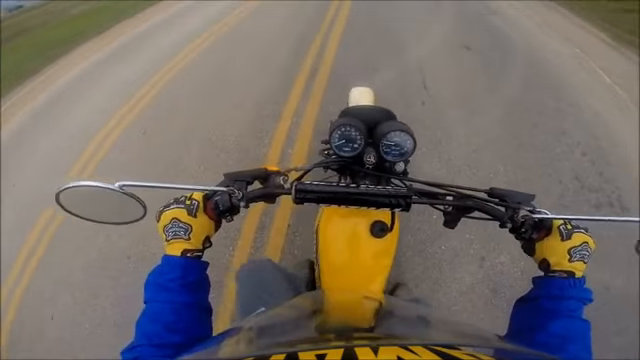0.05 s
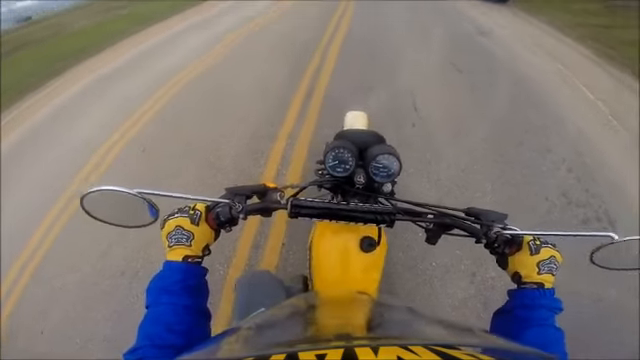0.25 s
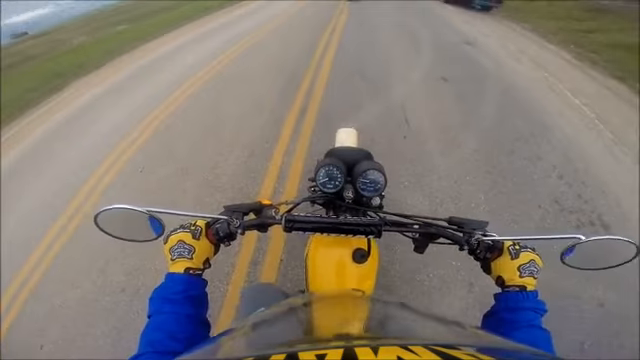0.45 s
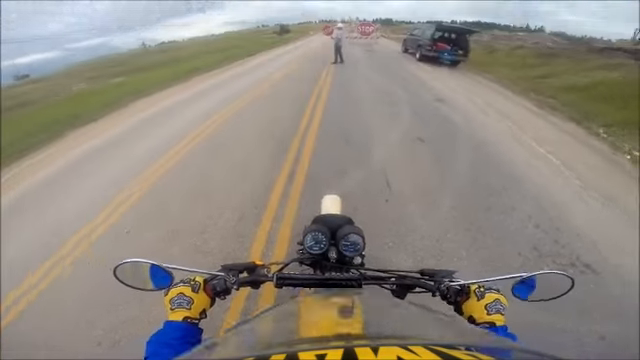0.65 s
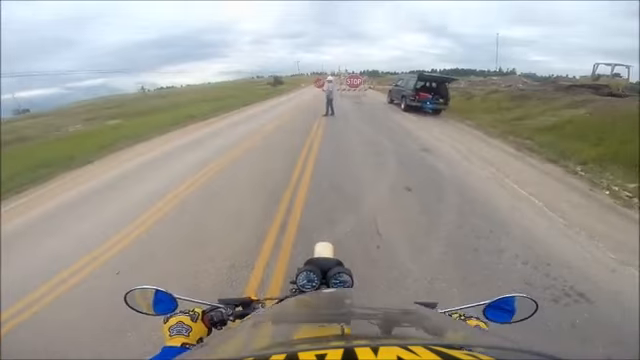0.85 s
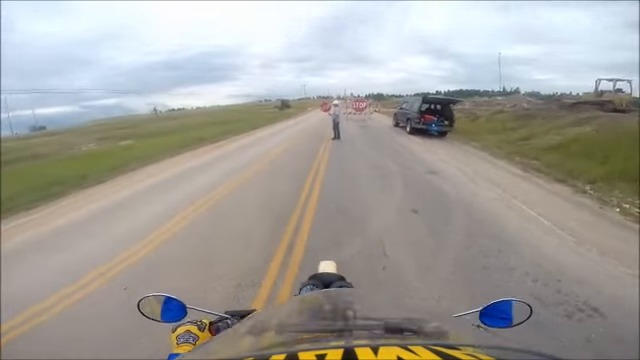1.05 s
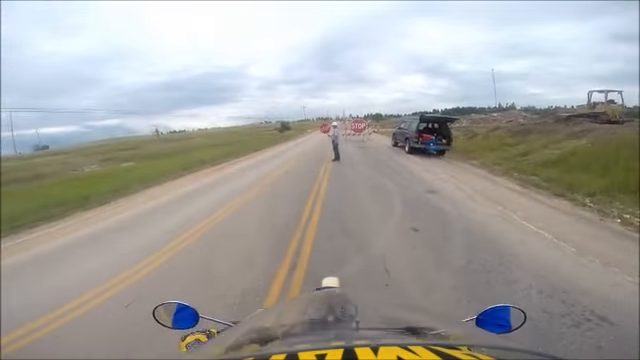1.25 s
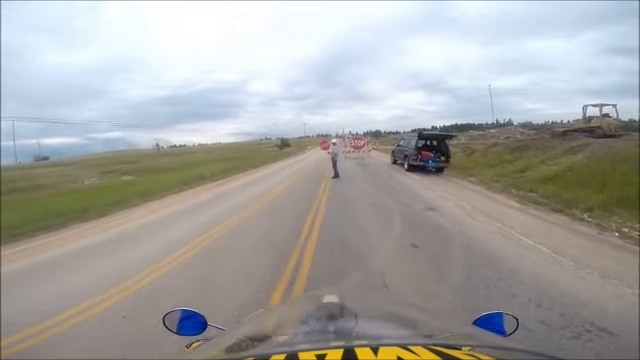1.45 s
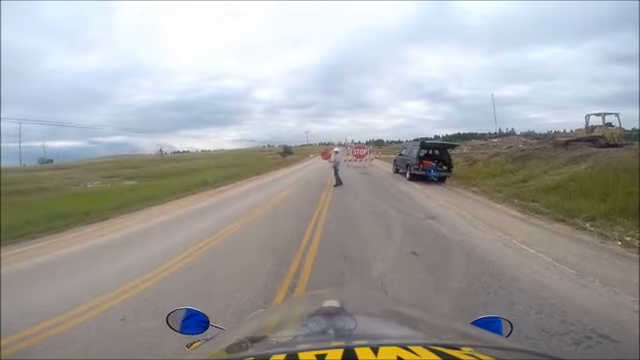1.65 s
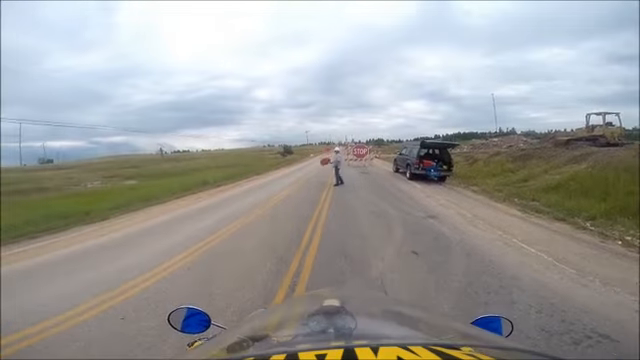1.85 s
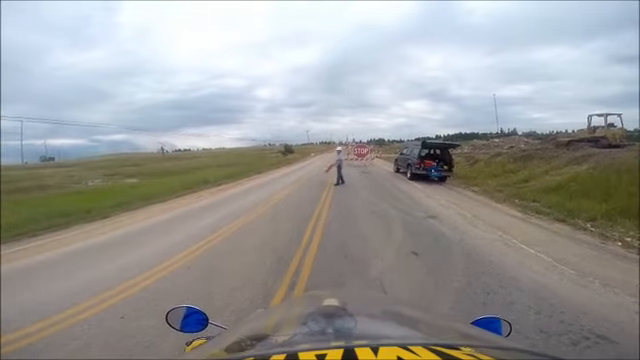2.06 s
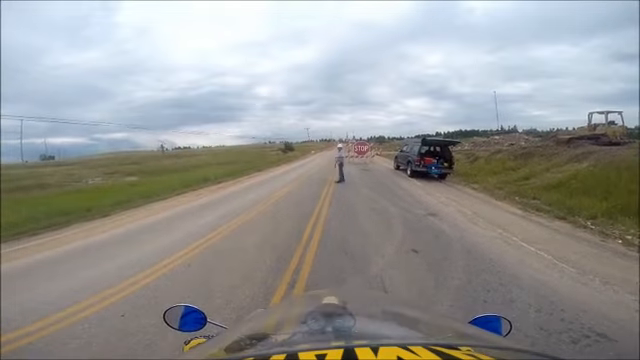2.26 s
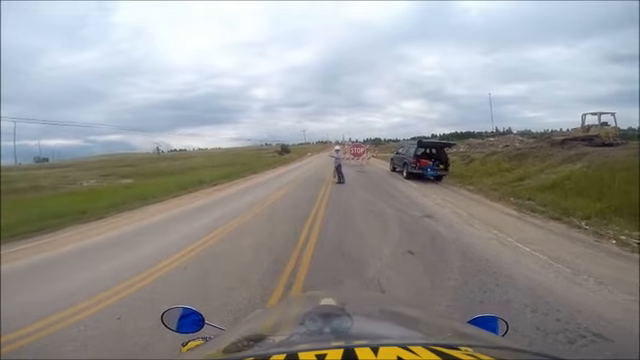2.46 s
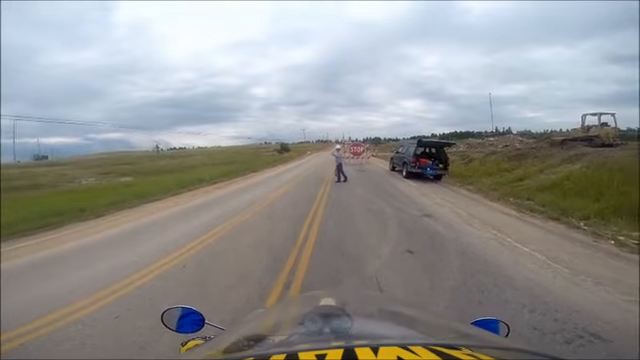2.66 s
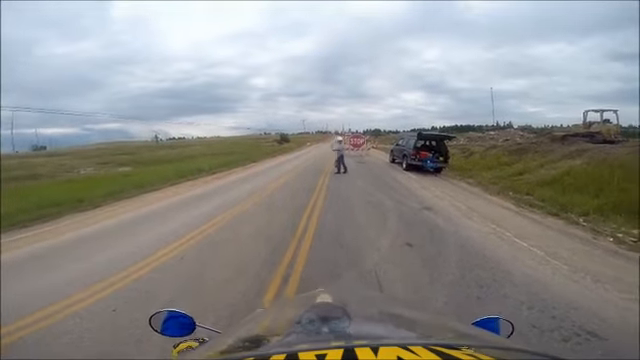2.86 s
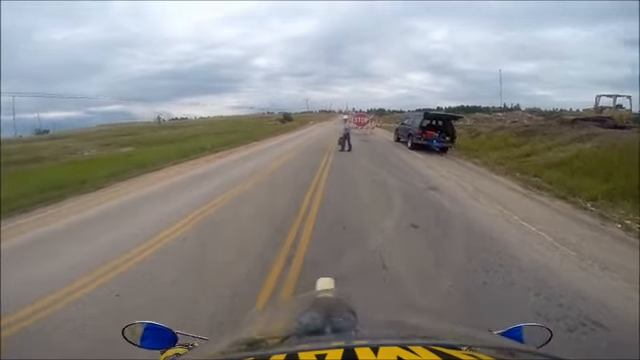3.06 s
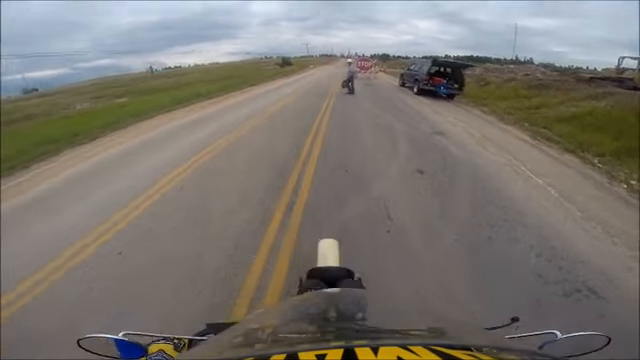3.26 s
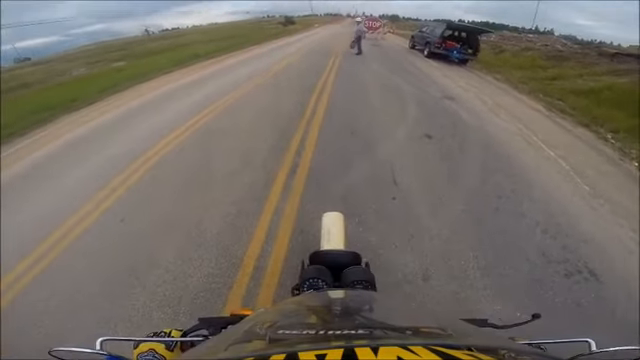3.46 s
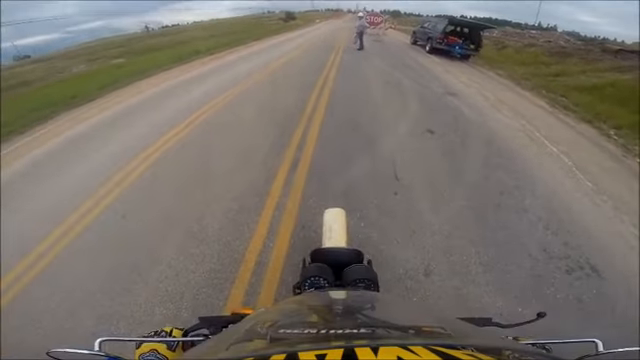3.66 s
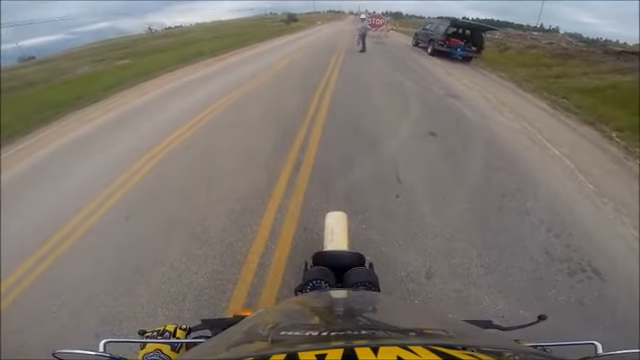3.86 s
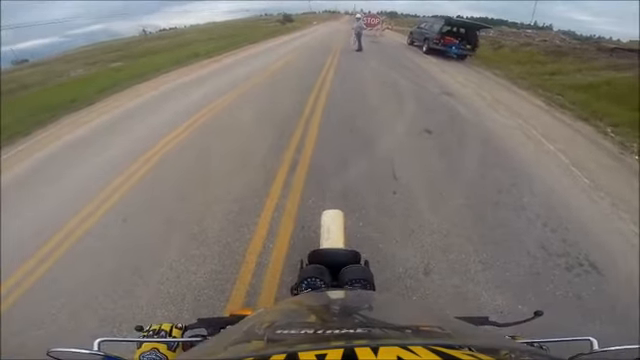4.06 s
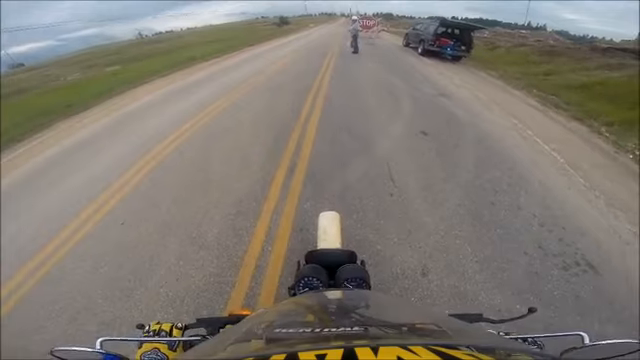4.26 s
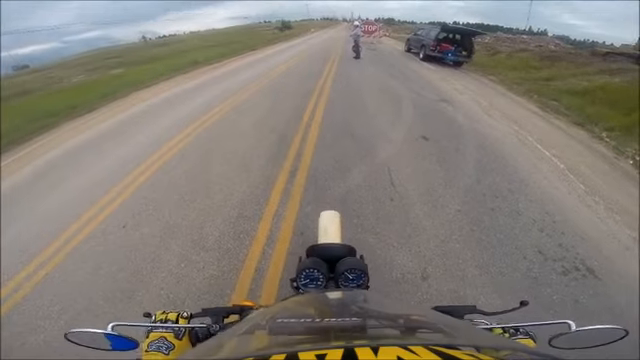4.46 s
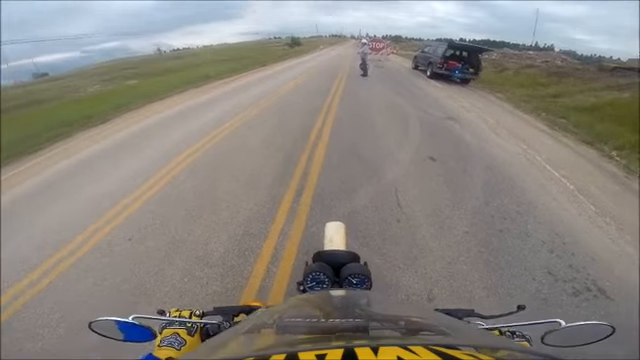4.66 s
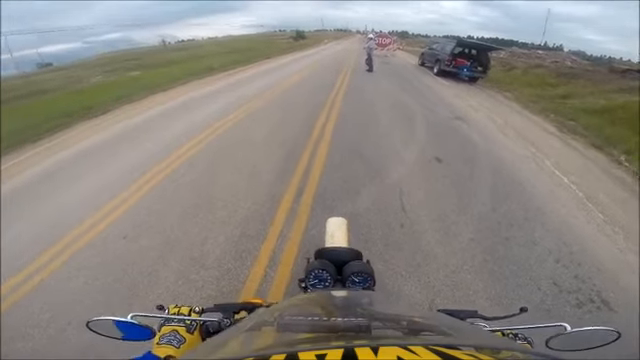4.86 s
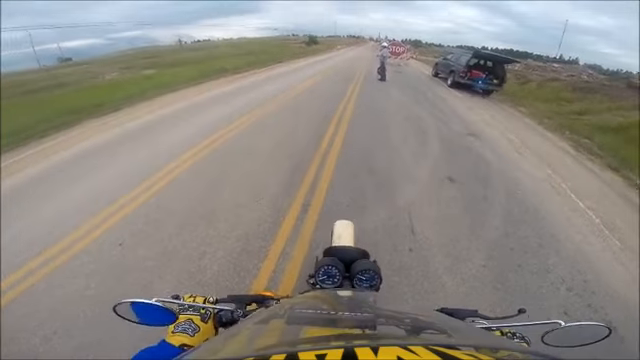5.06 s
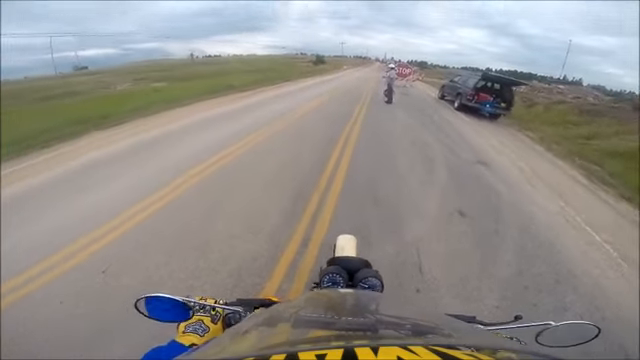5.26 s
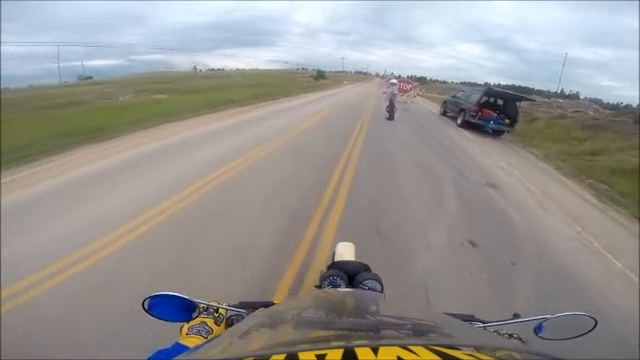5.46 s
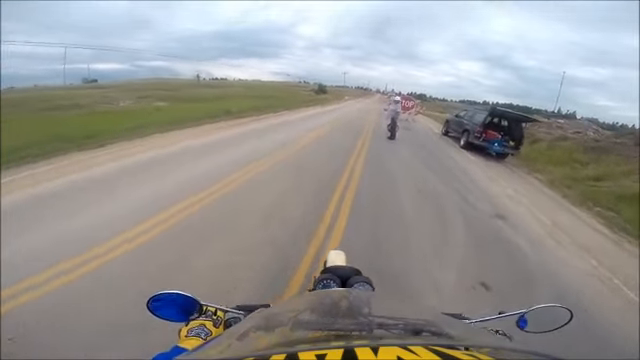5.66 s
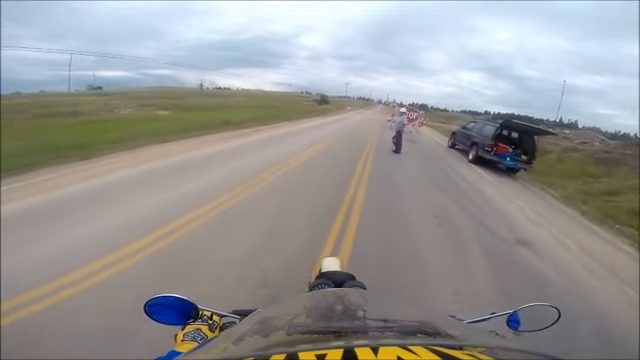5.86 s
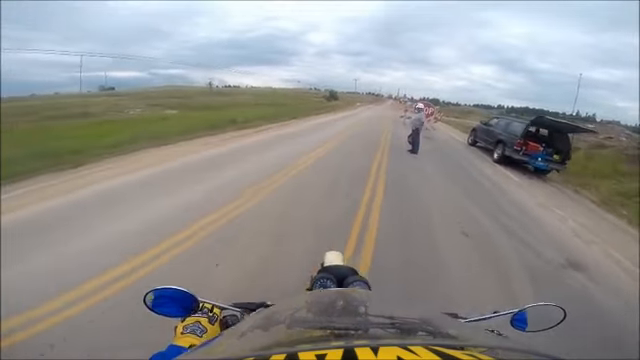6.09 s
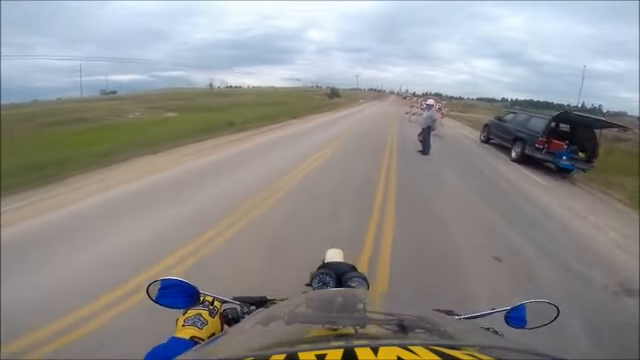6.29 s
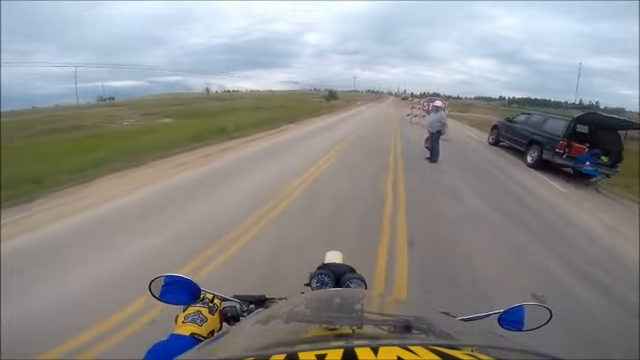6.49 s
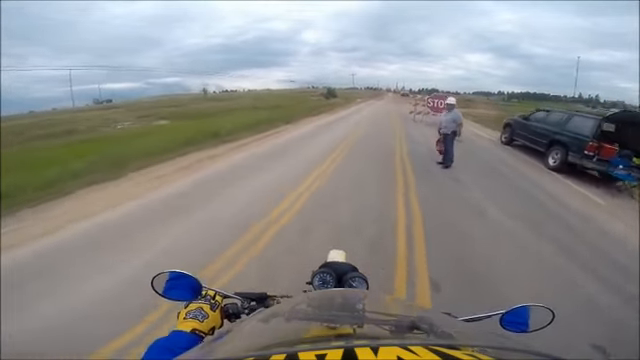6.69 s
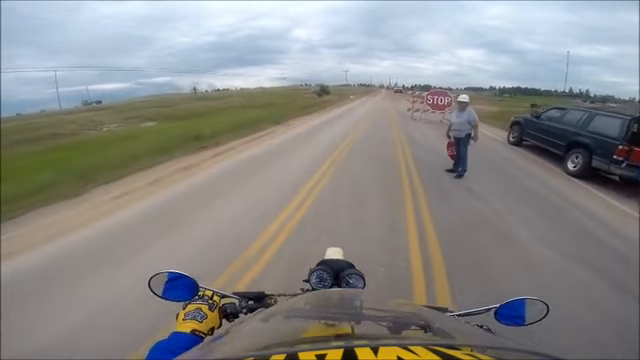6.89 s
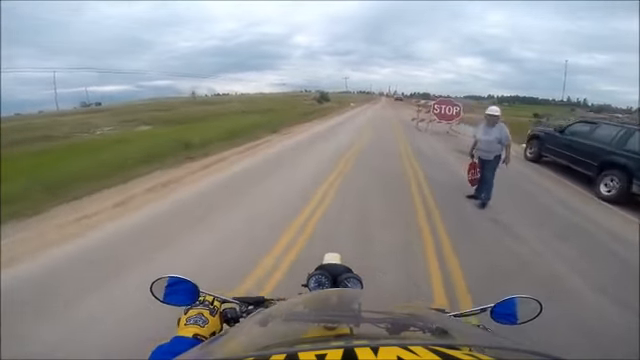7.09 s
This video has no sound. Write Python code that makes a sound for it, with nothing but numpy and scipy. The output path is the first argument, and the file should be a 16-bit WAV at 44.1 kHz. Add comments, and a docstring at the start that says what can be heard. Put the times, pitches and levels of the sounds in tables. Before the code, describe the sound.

A two-stroke motorcycle idles with uneven metallic pops, revs once, then pulls away with a steady rising buzz over light wind.

```python
"""Two-stroke motorcycle pulling away

A single cylinder, heard from the rider's helmet. It coasts at idle, firing only every few turns
(ring, ding, ding), takes a blip of throttle in bursts of firings, then pulls away evenly.
Every crank turn puffs the exhaust; firings ring the thin pipe shell and the cooling fins.
Light wind rumbles underneath, with a faint whine, two small rattles and one low sliding tone."""
import sys
import numpy as np
from scipy import signal
from scipy.fft import rfft, irfft, next_fast_len
from scipy.io import wavfile
from scipy.ndimage import uniform_filter1d

SR = 44100
rng = np.random.default_rng(int(sys.argv[2]) if len(sys.argv) > 2 else 0)


def wav_record(signal):
    """Record a signal, one row per channel, as 16-bit PCM in the file named by sys.argv[1]."""
    frames = np.transpose(np.atleast_2d(signal))
    bounded = np.clip(frames, -1, 1)
    # unit amplitude maps onto the largest positive 16-bit level
    quanta = np.round(bounded * 32767).astype(np.int16)
    wavfile.write(sys.argv[1], SR, quanta)


N = 314433
T = np.arange(N) / SR
SIZE = next_fast_len(N + SR)
FREQ = np.maximum(np.arange(SIZE // 2 + 1) * SR / SIZE, 1)
# bands in which the layers' levels are set: low_hz, high_hz
PUFF_BAND, RING_BAND, HISS_BAND = (200, 480), (900, 3300), (3300, 9000)
BANG_BAND, CRACK_BAND, NOTE_BAND = (900, 2200), (2200, 9000), (400, 4000)
BUFFET_BAND, RUSH_BAND = (12, 32), (65, 170)
CRUISE_HZ, FULL_FIRING_DB = 35, -40
HIT_SIZE = np.sqrt(.02 * SR)  # an impulse with the energy of 20 ms at unit rms


def undb(db):
    """Decibels to gain."""
    return 10 ** (np.asarray(db) / 20)


def curve(table, t):
    """Value at the times t of an envelope of (time_s, value) points."""
    return np.interp(t, *np.transpose(table))


def colour(points):
    """Gain at every frequency from (freq_hz, level_db) points."""
    hz, db = np.transpose(points)
    return undb(np.interp(np.log(FREQ), np.log(hz), db))


def peak(hz, width_hz):
    """Gain of one resonance, 1 at its centre."""
    return 1 / np.sqrt(1 + ((FREQ ** 2 - hz ** 2) / (FREQ * width_hz)) ** 2)


def above(hz):
    """Gain of a steep high-pass."""
    return 1 / np.sqrt(1 + (hz / FREQ) ** 12)


def unit(gain, band):
    """Scale a response so that unit white noise comes out with unit rms inside the band."""
    return gain / np.sqrt(np.mean(gain ** 2 * ((FREQ > band[0]) & (FREQ < band[1]))))


def resonate(x, gain):
    """Causal filter with this gain: narrow peaks ring on after a blow."""
    cepstrum = irfft(np.log(gain + 1e-9), SIZE)
    cepstrum[1:SIZE // 2] *= 2
    cepstrum[SIZE // 2 + 1:] = 0
    return irfft(rfft(x, SIZE) * np.exp(rfft(cepstrum)), SIZE)[:N]


def pulses(times, sizes):
    """One impulse at each time."""
    inside = (times >= 0) & (times < T[-1])
    return np.bincount((times[inside] * SR).astype(int), sizes[inside], N)


def gas(times, sizes, rise_s, decay_s):
    """A burst of turbulent noise after each time, with the energy of an impulse of that size."""
    t = T[:SR // 4]
    power = ((1 - np.exp(-(t / rise_s) ** 2)) * np.exp(-t / decay_s)) ** 2
    envelope = signal.fftconvolve(pulses(times, sizes ** 2), power / power.sum())[:N]
    return np.sqrt(np.maximum(envelope, 0)) * rng.standard_normal(N)


def disperse(x, spread_s, step_hz):
    """Smear each blow alike: every frequency has its own delay, as in bending waves in sheet metal."""
    delay = spread_s * np.interp(FREQ / step_hz, np.arange(512), rng.random(512))
    return irfft(rfft(x, SIZE) * np.exp(-2j * np.pi * np.cumsum(delay) * SR / SIZE), SIZE)[:N]


def turn_db(effort, hz, cruise_db, per_effort, per_octave):
    """Level of an ordinary turn: it follows effort and crank speed from its value in a steady cruise."""
    return cruise_db + per_effort * effort + per_octave * np.log2(hz / CRUISE_HZ)


# the revs, from idle through the blip to pulling away: time_s, turns_hz
CRANK_SPEED = [(0.0, 26.11), (1.5, 26.14), (3.5, 24.44), (3.95, 29.12), (4.2, 44.58), (4.48, 58.23),
               (4.65, 52.21), (4.92, 44.63), (5.19, 29.42), (5.48, 32.99), (5.85, 32.5), (6.17, 39.09),
               (6.6, 44.31), (7.13, 51.98)]

def crank():
    """Crank angle in turns, nudged so that the listed firings fall near whole turns."""
    angle = np.cumsum(curve(CRANK_SPEED, T)) / SR
    times = np.transpose(HARD_FIRINGS)[0]
    at_firing = np.interp(times, T, angle)
    whole_turns = np.cumsum(np.round(np.diff(at_firing, prepend=0)))
    lead = np.interp(T, times, whole_turns - at_firing)
    return angle + uniform_filter1d(lead, size=SR // 9)  # the nudges are spread smoothly over about a tenth of a second


# tone of the exhaust outlet: freq_hz, relative_db
EXHAUST_EQ = [(30, -24), (80, -23), (120, -10.5), (165, -14.5), (222, -4.5), (262, 0), (325, 5.5),
              (375, -4), (450, -15.5), (495, -6.5), (555, -32.5), (620, -14), (750, -17.5), (900, -27),
              (3000, -38), (12000, -70)]

def exhaust(times, sizes, hz):
    """Each turn sends a pressure pulse down the pipe; its reflection is strongest at middling revs."""
    reflected = np.interp(hz, [28, 31.7, 39.7, 53.4], [.072, .15, .38, .033])
    blow = pulses(times + .00175, sizes) + pulses(times + .01085, sizes * reflected)
    flutter = .07 * gas(times, sizes, rise_s=.003, decay_s=.012)
    swell = uniform_filter1d(blow, size=12)  # the port takes a moment to open
    return resonate(swell + flutter, unit(colour(EXHAUST_EQ), PUFF_BAND))


# the rider's head, 0 upright to 1 bowed over the tank: time_s, bow_fraction
HEAD_BOW = [(0, 0.97), (.55, 0.85), (.9, 0.54), (1.4, 0.08), (3.05, 0.02), (3.6, 0.69), (4.1, 0.88),
            (5.0, 0.71), (5.7, 0.87)]
# tone of the drone with the head up: freq_hz, relative_db
HEAD_UP_EQ = [(40, -38.5), (88, 8), (130, -9), (160, -30), (195, 5), (240, -10), (300, 0.5), (345, 3),
              (400, -24.5), (500, -4), (800, -28), (2000, -40), (6000, -91)]
# tone of the drone with the head bowed: freq_hz, relative_db
HEAD_DOWN_EQ = [(40, -53), (88, -11), (135, 0), (185, 4), (240, -10.5), (320, -16), (375, 5), (425, -1),
                (480, -27), (800, -25.5), (2000, -53), (6000, -86)]

def piston_drone(times, hz):
    """The piston pumps air, down and up: a soft drone whose level and colour follow the rider's head."""
    head_up_db, bowed_boost_db = -57, 8
    level_db = head_up_db + bowed_boost_db * curve(HEAD_BOW, times) + rng.standard_normal(len(times))
    sizes = undb(level_db) * np.sqrt(SR / hz)
    strokes = pulses(times + .003894, sizes) + .5 * pulses(times + .47 / hz, sizes)
    air = .7 * disperse(strokes, spread_s=.022, step_hz=90)
    air += .55 * gas(times, sizes, rise_s=.008, decay_s=.04)
    up, down = (resonate(air, unit(colour(eq), PUFF_BAND)) for eq in (HEAD_UP_EQ, HEAD_DOWN_EQ))
    bowed = curve(HEAD_BOW, T)
    return (1 - bowed) * up + bowed * down


# ringing modes of the pipe shell and fins: pitch_hz, width_hz, hard_firing_db, even_running_db
METAL_MODES = [(975.4, 14.7, -5, -9), (1078.5, 23.4, 1.5, -4.5), (1195, 33, -4.5, -13.5),
               (1371, 14, -7.5, -11.5), (1516, 18.3, 3, -7.5), (1623, 55, -1, -5), (1659, 18, -1, -11),
               (1880, 110, -21.5, -37), (2048, 16.7, -2.5, -9), (2388, 20.7, -0.5, -8.5),
               (2500, 6.9, -26, -8.5), (2560, 18, -7.5, -22), (2744, 29, 1.5, -26), (2865, 62, -6, -7.5),
               (3113, 49, -4, -38), (3325, 170, -8, -18.5), (3850, 30, -5.5, -13), (4130, 270, -19, -20),
               (4780, 40, -8, -20.5), (5570, 17, -44, -19), (6250, 390, -19.5, -26.5)]
# the bed of dense, weak modes between them: freq_hz, relative_db
SHELL_EQ = [(200, -73.5), (450, -12.5), (620, -12.5), (750, -12.5), (870, -25), (1150, -33), (2000, -15.5),
            (3200, -23), (3560, -46), (4000, -20), (5200, -23), (6900, -26.5), (7900, -32), (10000, -32.5),
            (12500, -43), (15000, -45)]

def metal(mode_db, dense_db, split_hz):
    """Response of shell and fins, parted into the ring below the split and the sizzle above it."""
    power = (undb(dense_db) * colour(SHELL_EQ)) ** 2
    for (hz, width_hz, *_), db in zip(METAL_MODES, mode_db):
        skirt = (1 + (FREQ / (2 * hz)) ** 4) * (1 + (hz / (2 * FREQ)) ** 4)
        power = power + (undb(db) * peak(hz, width_hz)) ** 2 / skirt
    high = above(split_hz) ** 2
    return np.sqrt(power * (1 - high)), np.sqrt(power * high)


def clatter(times, ring, hiss, idling):
    """Soft, even combustion: knocks and rushing gas keep the metal ringing; at idle the hiss blurs."""
    low, high = metal([db for *_, db in METAL_MODES], dense_db=-7.5, split_hz=3530)
    low, high = unit(low, RING_BAND), unit(high, HISS_BAND)
    crisp = hiss * (1 - idling)
    knock = disperse(pulses(times + .003, ring), spread_s=.02, step_hz=110)
    rush = gas(times + .01, ring, rise_s=.018, decay_s=.014)
    sizzle = gas(times - .001, crisp, rise_s=.0075, decay_s=.017)
    sizzle += gas(times, hiss * idling, rise_s=.014, decay_s=.05)
    tick = disperse(pulses(times + .001035, crisp), spread_s=.014, step_hz=131.25)
    body = .9 * resonate(knock, low) + .35 * resonate(rush, low * above(1000))
    return body + resonate(.74 * sizzle + .66 * tick, high)


# fader for the sub-bass throb: time_s, level_db
THROB_LEVEL = [(0, -51), (2.5, -64.5), (3.6, -47.5), (4.1, -45.5), (4.5, -47.5), (4.85, -45.5),
               (5.4, -43.5), (5.8, -60), (6.15, -49.5), (7.13, -50.5)]

def throb(angle):
    """A deep pulse, one cycle for each turn of the crank."""
    return np.sqrt(2) * undb(curve(THROB_LEVEL, T)) * np.sin(2 * np.pi * angle)


# tone of the buffeting: freq_hz, relative_db
BUFFET_EQ = [(5, -17.5), (12, 2.5), (25, -10), (45, -16.5), (80, -29), (300, -80)]
# gusts on the helmet: peak_s, half_length_s, level_db
WIND_GUSTS = [(.25, 0.087, -44), (.66, 0.1, -48.5), (1.237, 0.59, -52), (3.24, 0.15, -43.5),
              (3.503, 0.11, -39.5), (3.964, 0.045, -48), (5.16, 0.091, -45.5), (6.768, .04, -54)]
# tone of the air and tyre rush: freq_hz, relative_db
RUSH_EQ = [(25, -5), (55, -11.5), (88, 0), (125, -6.5), (190, -7.5), (350, -9), (480, -14), (1000, -16),
           (2500, -23), (7000, -39), (15000, -52.5)]
# fader for the rush: time_s, level_db
RUSH_LEVEL = [(0, -58), (2, -61.5), (3.5, -60.5), (4.5, -52), (5.5, -57.5), (7.13, -70)]

def wind():
    """Slow buffeting on the helmet, swelling in gusts, and the broad rush of air and tyres."""
    lull_db, swing_db, swing_s = -57, 1, .37
    buffet = resonate(rng.standard_normal(N), unit(colour(BUFFET_EQ), BUFFET_BAND))
    rush = resonate(rng.standard_normal(N), unit(colour(RUSH_EQ), RUSH_BAND))
    wander = np.interp(T / swing_s, np.arange(128), rng.standard_normal(128))
    lull = undb(lull_db - swing_db * wander)
    gusts = sum(undb(db) * np.exp(-((T - s) / half_s) ** 2) for s, half_s, db in WIND_GUSTS)
    return np.hypot(lull, gusts) * buffet + undb(curve(RUSH_LEVEL, T)) * rush


# thin tones on top of the mix: pitch_hz, level_db
WHINE_TONES = [(8780, -85.5), (11719, -88.5)]

def whine():
    """Two faint, steady high tones."""
    return sum(np.sqrt(2) * undb(db) * np.sin(2 * np.pi * hz * T) for hz, db in WHINE_TONES)


# hard hits, each after unburnt charge has built up: start_s, strength_db, turns_in_a_row
HARD_FIRINGS = [(0.053, -39, 1), (.2, -40.5, 1), (.349, -47.5, 1), (.5, -45.5, 1), (.616, -48.5, 1),
                (0.772, -43.5, 1), (.966, -48.5, 1), (1.084, -47, 1), (1.201, -45.5, 1), (1.386, -52, 1),
                (1.504, -47, 1), (1.658, -44, 1), (1.808, -51, 1), (1.924, -51.5, 1), (2.041, -45.5, 1),
                (2.276, -49, 1), (2.469, -51, 1), (2.587, -53, 1), (2.71, -47, 1), (2.868, -56, 1),
                (2.995, -45.5, 1), (3.151, -51.5, 1), (3.438, -44, 1), (3.598, -41, 1), (3.751, -41, 1),
                (3.858, -43.5, 1), (3.963, -41.5, 1), (4.025, -39, 1), (4.081, -39, 1), (4.135, -38.6, 1),
                (4.181, -38.5, 2), (4.248, -38, 2), (4.329, -38, 3), (4.423, -39, 3), (4.511, -39, 3),
                (4.6, -38.5, 3), (4.697, -39, 3), (4.777, -38.5, 3), (4.861, -42.5, 2), (4.927, -43.5, 2)]

def firings():
    """Time and strength (dB) of each hard firing: a burst fades turn by turn as the charge is used up."""
    return np.transpose([(start_s + turn / curve(CRANK_SPEED, start_s), db - turn ** 2)
                         for start_s, db, count in HARD_FIRINGS for turn in range(round(count))])


# fins that ping out when the head is bowed close over them: pitch_hz, width_hz, gain_db
FIN_PINGS = [(1499, 57, 6), (2624, 140, 13.5), (4728, 177, 9)]

def bangs():
    """A hard firing slams the shell and the modes ring; the crack of escaping gas swells just after."""
    times, strength = firings()
    ring = undb(strength) * HIT_SIZE
    crack = undb(-40.5 + 1.88 * (strength - FULL_FIRING_DB)) * HIT_SIZE  # harder hits are brighter
    # the port opens sooner after the spark when the crank turns fast
    port_s = times - .007 + .19 / curve(CRANK_SPEED, times)
    low, high = metal([db for _, _, db, _ in METAL_MODES], dense_db=.5, split_hz=1890)
    slam = disperse(pulses(port_s + .001917, ring), spread_s=.011, step_hz=197)
    blast = gas(port_s - .001, ring, rise_s=.0014, decay_s=.02)
    spit = gas(port_s - .0015, crack, rise_s=.0051, decay_s=.014)
    bang = resonate(.48 * slam + .97 * blast, unit(low, BANG_BAND) * above(450))
    bang += resonate(spit, unit(high, CRACK_BAND))
    ping = resonate(bang, sum(undb(db) * peak(hz, width_hz) ** 2 for hz, width_hz, db in FIN_PINGS))
    close = curve(HEAD_BOW, T) ** 4
    return bang * (1 - .44 * close) + ping * close


# small ticks of loose parts: start_s, level_db
RATTLE_HITS = [(.487, -58), (3.046, -62)]

def rattles():
    """A loose part ticks now and then: a short, bright burst of noise."""
    times, db = np.transpose(RATTLE_HITS)
    ticks = gas(times, undb(db) * HIT_SIZE, rise_s=.002, decay_s=.011)
    return resonate(ticks, unit(peak(hz=4240, width_hz=3300) ** 2, CRACK_BAND))


def slide(start_s=3.195, length_s=.107, from_hz=230, to_hz=81, level_db=-47.5):
    """A faint low tone swells and fades as its pitch drops."""
    progress = np.clip((T - start_s) / length_s, 0, 1)
    hz = from_hz * (to_hz / from_hz) ** progress
    envelope = np.sqrt(2) * undb(level_db) * np.sin(np.pi * progress)
    return envelope * np.sin(2 * np.pi * np.cumsum(hz) / SR)


# exhaust pipe resonances (two higher ones of a series about 125 Hz apart) and fins that hold a note in even
# running: pitch_hz, width_hz, delay_s, cruise_db, db_per_effort_db, db_per_rev_octave
PIPE_AND_FIN_NOTES = [(615, 27, 0.00393, -57.5, 0.1, -6.5), (749, 46, 0.00406, -57.5, 1, -2),
                      (1088, 18.06, .003, -64.5, 7, -20), (1653, 18.4, 0.00301, -45.5, 1.64, 7.5),
                      (2040, 15, 0.003055, -58, 1.3, 9), (2745, 11, .004, -54.5, -0.7, -13),
                      (2849, 44, .007, -52, 0.5, -1)]

def singing_pipe_and_fins(times, burn, effort, hz):
    """Under load, every turn excites the pipe resonances and the fins again, so they hold their notes."""
    drive = burn * np.interp(effort, [-13, -6], [0, 1])  # fades in as the engine starts to pull
    notes = np.zeros(N)
    for pitch_hz, width_hz, delay_s, *response in PIPE_AND_FIN_NOTES:
        knock_s = times + delay_s
        sizes = drive * undb(turn_db(effort, hz, *response))
        knocks = pulses(knock_s, sizes) + .38 * gas(knock_s, sizes, rise_s=.005, decay_s=.022)
        resonance = peak(pitch_hz, width_hz) * peak(pitch_hz, 3.5 * width_hz)
        notes += resonate(knocks, .93 * unit(resonance, NOTE_BAND))
    return notes


# how hard the ordinary turns burn, 0 for a steady pull: time_s, effort_db
ENGINE_EFFORT = [(0, -18), (.8, -28), (2.6, -26.5), (3.25, -19.5), (3.75, -31), (4.15, -28), (4.3, -1.5),
                 (4.7, -9), (4.9, -4), (5.05, -4.5), (5.36, 0.5), (5.75, 1.14), (6.05, -1.2), (6.65, 0.25),
                 (7.0, 3.5), (7.13, 3)]

def engine():
    """The crank times the ordinary turns; hard firings sound at their listed times."""
    angle = crank()
    times = np.interp(np.arange(int(angle[-1]) + 1), angle, T)
    time_jitter, puff_jitter, burn_jitter, hiss_jitter = rng.standard_normal((len(times), 4)).T
    hz, effort = curve(CRANK_SPEED, times), curve(ENGINE_EFFORT, times)
    idling = np.clip((30 - hz) / 3, 0, 1)
    times = times + (.00003 + .0005 * idling) * time_jitter  # a coasting crank turns less evenly
    turn_size = np.sqrt(SR / hz)  # an impulse with the energy of one turn at unit rms

    puff_db = turn_db(effort, hz, cruise_db=-42.5, per_effort=.5, per_octave=8.8)
    puff_db = np.maximum(puff_db, -53.5)  # the piston pumps this much even without burning
    puff = turn_size * undb(puff_db + (idling - .67) * puff_jitter)
    fired_s, strength = firings()
    fired_turns = np.round(np.interp(fired_s, T, angle)).astype(int)
    puff[fired_turns] = undb(-40.5 + .36 * (strength - FULL_FIRING_DB)) * HIT_SIZE

    burn = turn_size * undb(.5 * burn_jitter)
    ring = burn * undb(turn_db(effort, hz, cruise_db=-43.5, per_effort=1, per_octave=.38))
    hiss_db = turn_db(effort, hz, cruise_db=-53.5, per_effort=2.07, per_octave=-2.5)
    hiss = burn * undb(hiss_db + .5 * hiss_jitter)
    notes = singing_pipe_and_fins(times, burn, effort, hz)
    low_end = exhaust(times, puff, hz) + piston_drone(times, hz) + throb(angle)
    return low_end + clatter(times, ring, hiss, idling) + bangs() + notes


def scene():
    """Open road in mono: no walls and no echo."""
    return (engine() + rattles() + wind() + slide() + whine())[None]


def record(dry):
    """A steep low-pass trims the very top."""
    top_hz = 15300
    return signal.sosfilt(signal.ellip(10, .2, 80, top_hz, fs=SR, output="sos"), dry)


dry = scene()
out = record(dry)
wav_record(out)
```